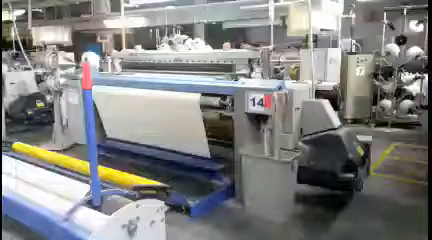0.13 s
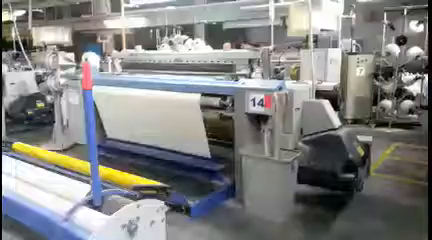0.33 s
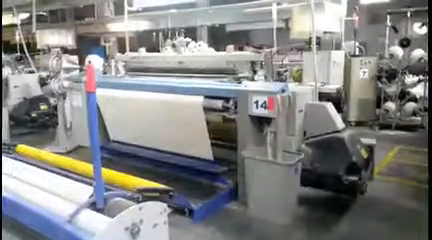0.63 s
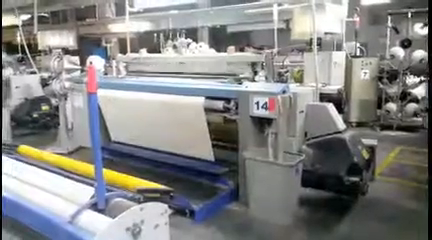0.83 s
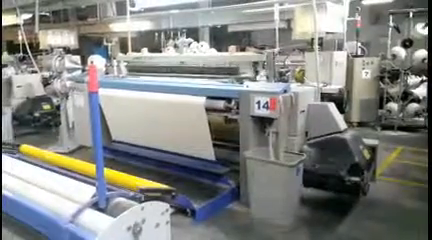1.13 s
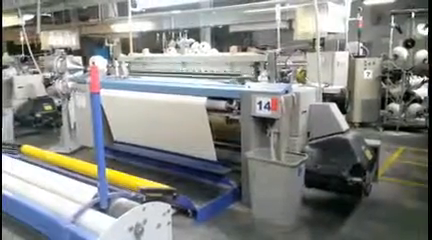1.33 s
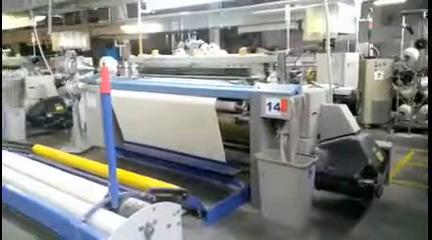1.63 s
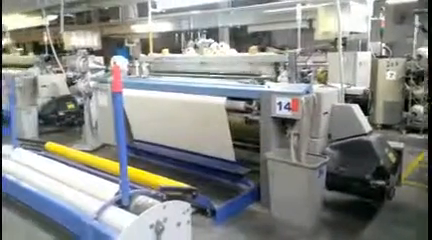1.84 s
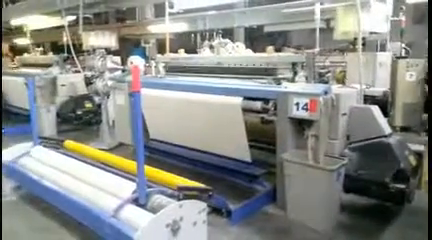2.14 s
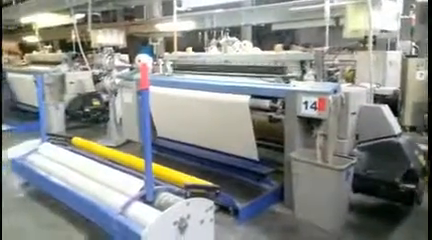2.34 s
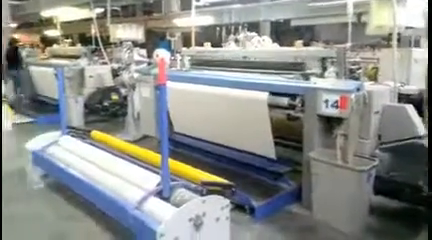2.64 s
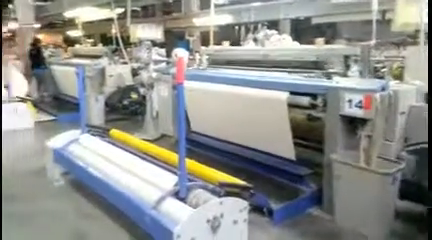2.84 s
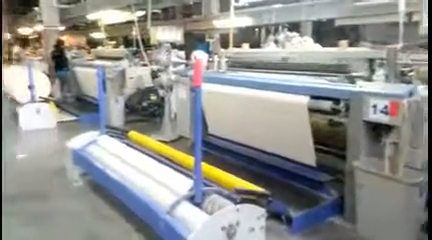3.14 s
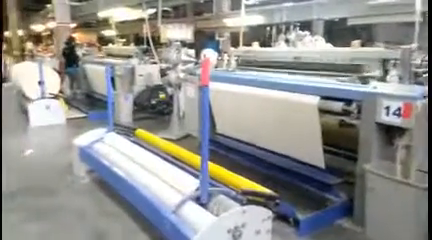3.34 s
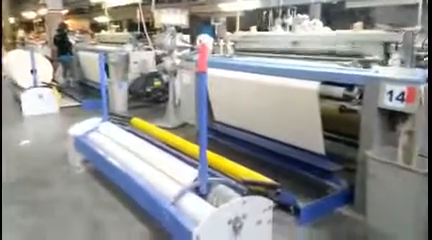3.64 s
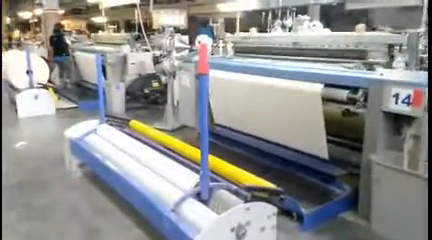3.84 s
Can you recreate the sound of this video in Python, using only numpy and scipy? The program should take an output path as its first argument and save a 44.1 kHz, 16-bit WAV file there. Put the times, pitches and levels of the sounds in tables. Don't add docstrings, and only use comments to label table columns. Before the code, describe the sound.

Many weaving looms roar in a large mill hall, the nearest beating about thirteen times a second with air puffs; a bright hose hiss stops midway, heard through a small, compressed, nearly mono microphone.

```python
import sys
import numpy as np
from scipy import signal
from scipy.fft import rfft, irfft
from scipy.io import wavfile
from scipy.ndimage import uniform_filter1d

SR = 44100
rng = np.random.default_rng(int(sys.argv[2]) if len(sys.argv) > 2 else 0)


def amplitude_ratio(level_db):
    exponent = np.asarray(level_db, float) / 20
    return 10 ** exponent


def generate_wav(sig):
    pcm = np.round(np.clip(np.atleast_2d(sig).T, -1, 1) * 32767).astype(np.int16)
    wavfile.write(sys.argv[1], SR, pcm)


N = 176400
PICKS_PER_S = 13.333


def rms_one(x):
    return x / np.sqrt(np.mean(x ** 2) + 1e-20)


def in_time(rows):
    return np.interp(np.arange(N) / SR, *np.transpose(rows))


def drift(rate_hz):
    step = 40
    pole = np.exp(-2 * np.pi * step * rate_hz / SR)
    noise = rng.standard_normal(N // step + 2002)
    slow = signal.lfilter([1], [1, -2 * pole, pole * pole], noise)[2000:]
    return np.interp(np.arange(N) / step, np.arange(len(slow)), rms_one(slow - slow.mean()))


def colour(x, spectrum, slow_db=0., fast_db=0.):
    octave = np.log2(np.maximum(np.arange(N // 2 + 1) * SR / N, 1))
    hz, db = np.transpose(spectrum)
    shaped = rfft(x) * amplitude_ratio(np.interp(octave, np.log2(hz), db, left=-90, right=-90))
    out, shared = 0, drift(4.0)
    for centre in np.arange(np.floor(np.log2(hz[0])), np.log2(hz[-1]) + .5, .5):
        band = np.cos(np.pi * np.clip(octave - centre, -.5, .5)) ** 2
        flicker_db = slow_db * (.6 * shared + drift(2.5)) + fast_db * drift(15)
        out = out + irfft(shaped * band, N) * amplitude_ratio(flicker_db)
    return rms_one(out)


def ring(clicks, hz, t60_s):
    radius = amplitude_ratio(-60 / (t60_s * SR))
    angle = 2 * np.pi * hz / SR
    resonance = [1, -2 * radius * np.cos(angle), radius * radius]
    return signal.lfilter([0, np.sin(angle)], resonance, clicks + 1e-18)


def narrow(hz, width_hz):
    t60_s = np.log(1000) / (np.pi * width_hz)
    return rms_one(ring(ring(rng.standard_normal(N), hz, t60_s), hz, t60_s))


def struck(modes, at):
    spread_db = 1.2
    period = SR / PICKS_PER_S
    places = (np.arange(int(5 * PICKS_PER_S)) + at % 1) * period - (period * 14 - SR)
    places = places.astype(int)
    places = places[(places >= 0) & (places < N + SR)]
    out = 0
    for hz, level_db, t60_s in modes:
        clicks = np.zeros(N + SR)
        clicks[places] = amplitude_ratio(spread_db * rng.standard_normal(80))[:len(places)]
        out = out + amplitude_ratio(level_db) * rms_one(ring(clicks, hz, t60_s)[SR:])
    return out


def microphone_turn():
    # time_s, level_db
    turn_path = [
        (0, -2),
        (.8, 3),
        (1.6, 1.5),
        (2.4, -1),
        (2.9, -3),
        (3.2, -6),
        (3.6, -4.5),
        (4, -8.5),
    ]
    return amplitude_ratio(in_time(turn_path))


def frame_thud(turn):
    # pitch_hz, level_db, t60_s
    frame_modes = [(13.33, -43, .8), (26.67, -41, .8), (53.33, -50, .8), (66.67, -39, .8),
                   (106.67, -40, .8)]
    return turn * struck(frame_modes, at=0.406)


def harness_knock(turn):
    # pitch_hz, level_db, t60_s
    harness_modes = [(160, -44, .6), (173.3, -47, .6), (213.3, -40, .6), (253.3, -45, .6), (266.7, -45, .6),
                     (280, -43, .6), (306.7, -44, .6), (346.7, -48, .6), (373.3, -43, .6), (546.7, -48, .5),
                     (626.7, -49, .5)]
    return turn ** -0.14 * struck(harness_modes, at=.9)


def guard_clacks():
    # pitch_hz, level_db
    guard_modes = [(133.3, -49), (186.7, -53), (226.7, -46), (293.3, -49), (333.3, -50), (400, -50),
                   (440, -52), (466.7, -54), (506.7, -50), (586.7, -48), (666.7, -50), (706.7, -50),
                   (813.3, -46), (840, -49)]
    t60_s = .5
    return struck([(hz, level_db, t60_s) for hz, level_db in guard_modes], at=.62)


def rumble(turn):
    # frequency_hz, density_db (per Hz)
    rumble_spectrum = [(12, -36), (20, 8), (65, 3.5), (278, 8), (380, 4), (441, -3), (700, -10), (910, -36),
                       (1540, -120)]
    shaking = amplitude_ratio(-30) * colour(rng.standard_normal(N), rumble_spectrum, slow_db=.5, fast_db=1.7)
    bass = signal.sosfilt(signal.butter(2, 120, fs=SR, output="sos"), shaking)
    return shaking + (turn - 1) * bass


def weft_jets():
    # time_s, level_db
    flow_path = [(.3, -32), (2.05, -32.5), (2.17, -35.5), (2.38, -36.5), (2.56, -38), (2.83, -36),
                 (2.88, -39.5), (3.0, -37), (3.16, -38), (3.2, -34.5), (3.27, -32.5), (3.37, -37.5),
                 (3.43, -35.5), (3.6, -38), (3.65, -33.5), (3.8, -39), (3.9, -35.5), (4, -35)]
    # frequency_hz, density_db (per Hz)
    jet_spectrum = [(5500, -16), (7500, -3.5), (8300, -3.5), (10500, -5.5), (12800, -3.5), (14000, -5.5),
                    (15800, -11)]
    opens, shuts, edge_s = 0.38, 1, 0.0095
    leak, spread_db = .66, 1
    pick = np.arange(N) / SR * PICKS_PER_S
    strength = amplitude_ratio(spread_db * rng.standard_normal(80))[pick.astype(int)]
    is_open = (pick % 1 > opens) & (pick % 1 < shuts)
    valve = uniform_filter1d(strength * is_open, int(edge_s * SR))
    flow = rms_one(leak + (1 - leak) * valve) * amplitude_ratio(in_time(flow_path) + 1.0)
    return flow * colour(rng.standard_normal(N), jet_spectrum, fast_db=0.9)


def far_roar():
    # frequency_hz, density_db (per Hz)
    roar_spectrum = [(260, -17), (450, -12), (842, -5), (1240, -2), (2880, -6), (4300, -1.5), (6340, -12),
                     (8040, -27), (9000, -26), (11700, -37), (19800, -120)]
    return amplitude_ratio(-15.5) * colour(rng.standard_normal(N), roar_spectrum, slow_db=-0.05, fast_db=0.68)


def clatter():
    # frequency_hz, density_db (per Hz)
    clatter_spectrum = [(500, -13), (800, -11), (1250, 3), (2000, 5.5), (2900, -12.5), (4250, 9.5),
                        (6000, -1.5), (8000, -8.5)]
    ticks_per_s, t60_s, pitch_count = 2500, 0.084, 90
    sizes = amplitude_ratio(2.46 * np.minimum(rng.exponential(1, N), 5)) * rng.choice([-1, 1], N)
    born = rng.random(N) < ticks_per_s * amplitude_ratio(2.5 * drift(8)) / SR
    dealt = rng.integers(0, pitch_count, N)
    pitches = np.linspace(500, 8000, pitch_count) + rng.uniform(-40, 40, pitch_count)
    pings = sum(ring(sizes * born * (dealt == k), hz, t60_s) for k, hz in enumerate(pitches))
    return amplitude_ratio(-23.5) * colour(pings, clatter_spectrum)


def whine():
    # time_s, level_db
    whine_path = [
        (0, -34),
        (2.6, -48),
        (3, -25.5),
        (3.15, -31),
        (3.3, -36),
        (3.5, -44),
        (4, -49),
    ]
    return amplitude_ratio(in_time(whine_path)) * narrow(1217, width_hz=30)


def reeds():
    # pitch_hz, width_hz, level_db
    reed_bands = [(1467, 260, -38.5), (1700, 430, -32), (2402, 200, -36.5), (4114, 430, -28.5)]
    return sum(amplitude_ratio(level_db + 0.68 * drift(3.6)) * narrow(hz, width_hz)
               for hz, width_hz, level_db in reed_bands)


def hose():
    # frequency_hz, density_db (per Hz)
    hose_spectrum = [(3500, -30), (5000, 7.5), (6500, 5), (8500, 0.5), (10500, -2), (12900, -2),
                     (14200, -6), (15700, -13)]
    shut_s, hall_t60_s, valve_t60_s, hall_share = 2.092, .5, .06, .5
    after_s = np.maximum(np.arange(N) / SR - shut_s, 0)
    nozzle = amplitude_ratio(-1) * narrow(4900, width_hz=700)
    hiss = colour(rng.standard_normal(N), hose_spectrum) + nozzle
    hall_decay = hall_share * amplitude_ratio(-60 * after_s / hall_t60_s)
    valve_decay = (1 - hall_share) * amplitude_ratio(-60 * after_s / valve_t60_s)
    return amplitude_ratio(-26) * (hall_decay + valve_decay) * hiss


def shimmer(x):
    depth_db = 1.5
    cells = signal.stft(x, nperseg=1024)[2]
    patches = uniform_filter1d(rng.standard_normal(cells.shape), size=3, axis=0)
    patches = rms_one(uniform_filter1d(patches, size=3, axis=1))
    gain = amplitude_ratio(depth_db * patches - depth_db ** 2 / 10)
    return signal.istft(cells * gain, nperseg=1024)[1][:N]


def side_hiss():
    # centre_s, low_hz, high_hz, level_db
    hiss_bursts = [(.7430, 10980, 12400, -43), (.8824, 5140, 6800, -31), (.8824, 8980, 11680, -40),
                   (1.2771, 11680, 13080, -45), (1.6951, 7560, 8960, -40), (1.6951, 9620, 11000, -42),
                   (1.8344, 6800, 8830, -35), (1.8808, 4640, 5680, -31), (1.8808, 11700, 13700, -40),
                   (2.3684, 4200, 6200, -27), (2.3684, 6880, 8220, -42), (3.8313, 4550, 5680, -29)]
    size = 2048
    out = np.zeros(N)
    hz = np.arange(size // 2 + 1) * SR / size
    window = signal.windows.kaiser_bessel_derived(size, 4 * np.pi)
    for centre_s, low_hz, high_hz, level_db in hiss_bursts:
        band = (hz > low_hz) & (hz < high_hz)
        hiss = irfft(rfft(rng.standard_normal(size)) * band, size)
        start = round(2 * centre_s * SR / size - 1) * size // 2
        out[start:start + size] += amplitude_ratio(level_db) * rms_one(hiss * window)
    return out


def scene():
    turn = microphone_turn()
    loom = frame_thud(turn) + harness_knock(turn) + guard_clacks() + rumble(turn)
    hall = weft_jets() + far_roar() + clatter() + whine() + reeds() + hose()
    return np.tile(loom + shimmer(hall), (2, 1))


def low_pass(x):
    return signal.sosfilt(signal.butter(12, 15980, fs=SR, output="sos"), x)


def record(dry):
    window_s, share, target_db = 0.01, 0.51, -14.5
    ceiling, start_s = .78, .3016
    level_db = 10 * np.log10(uniform_filter1d(dry ** 2, int(window_s * SR)) + 1e-12)
    levelled = dry * amplitude_ratio(share * (target_db - level_db))
    rounded = ceiling * np.tanh(levelled / ceiling)
    hz = np.arange(N // 2 + 1) * SR / N
    limited = irfft(rfft(rounded) * ((hz > 8) & (hz < 15750)), N)
    started = np.arange(N) >= start_s * SR
    mix = limited * started + side_hiss() * [[1], [-1]]
    return low_pass(mix)


dry = scene()
out = record(dry)
generate_wav(out)
```